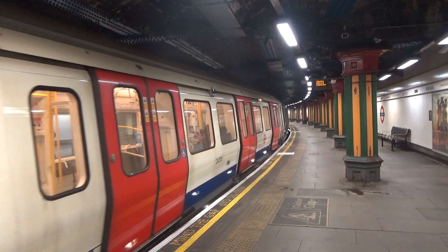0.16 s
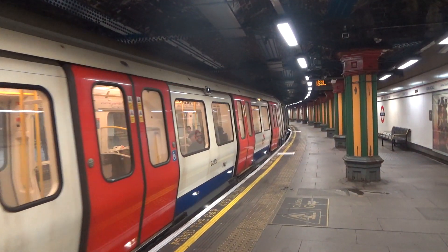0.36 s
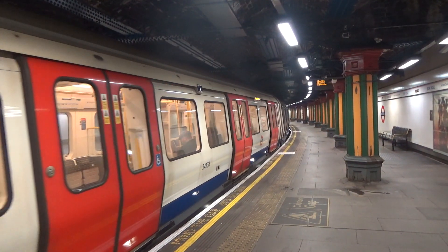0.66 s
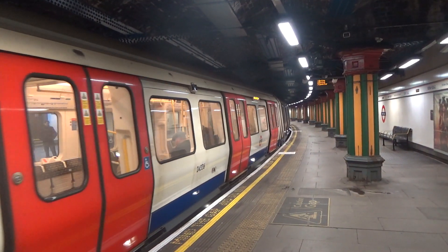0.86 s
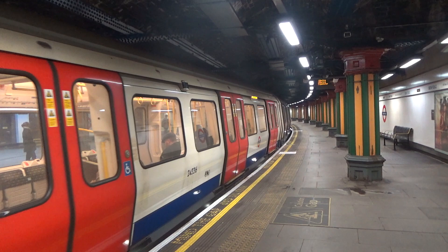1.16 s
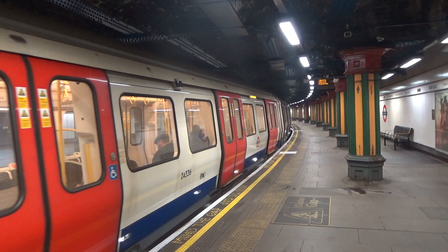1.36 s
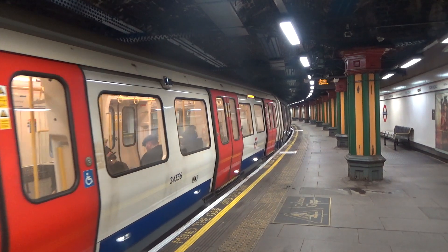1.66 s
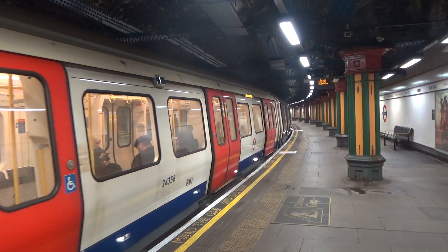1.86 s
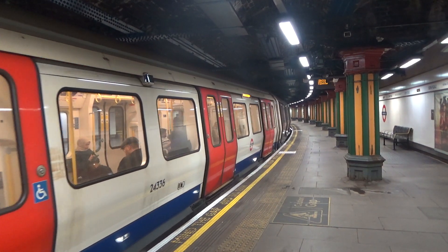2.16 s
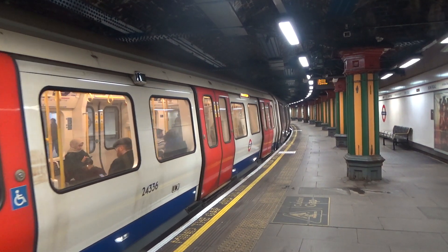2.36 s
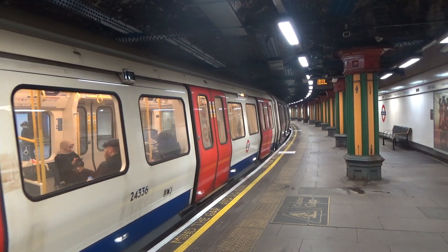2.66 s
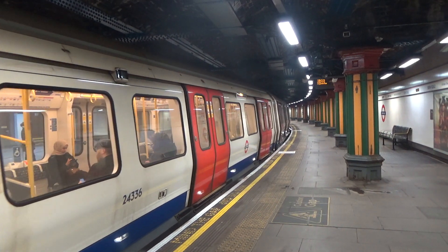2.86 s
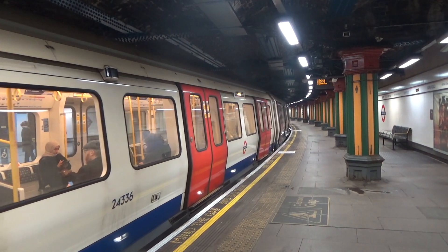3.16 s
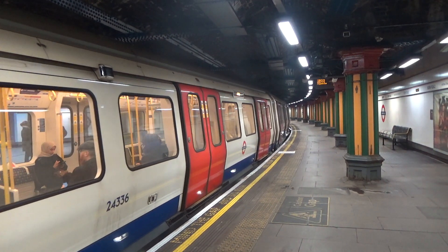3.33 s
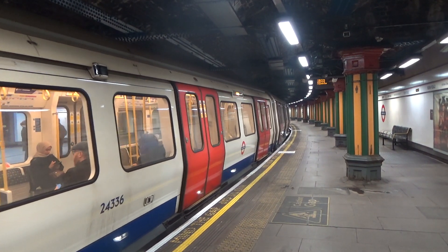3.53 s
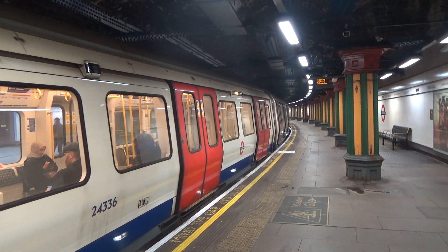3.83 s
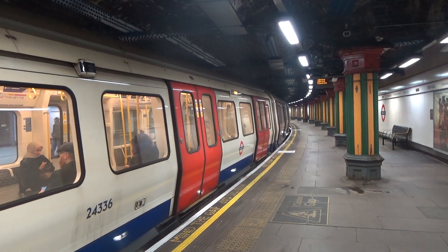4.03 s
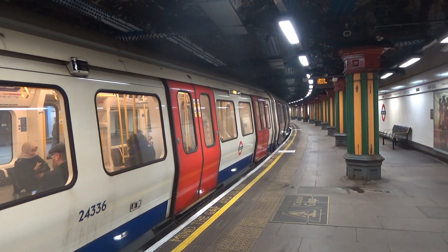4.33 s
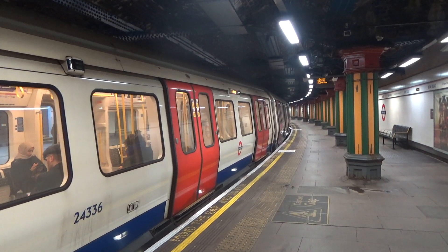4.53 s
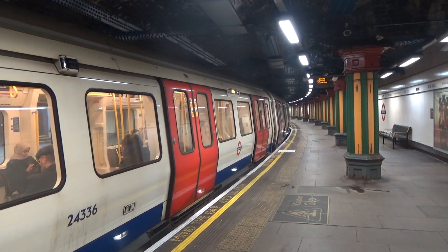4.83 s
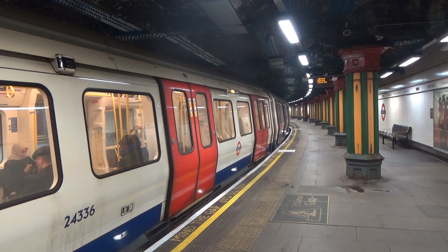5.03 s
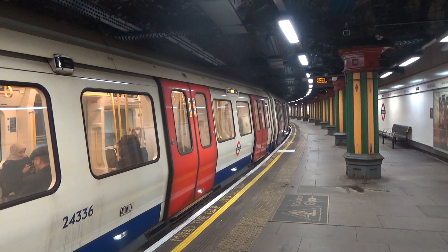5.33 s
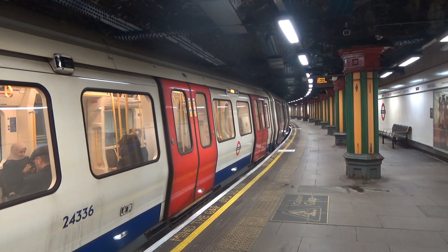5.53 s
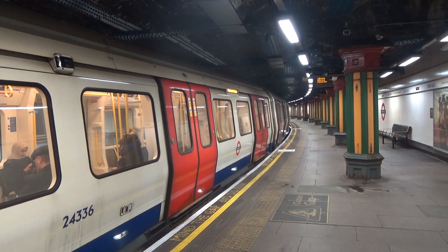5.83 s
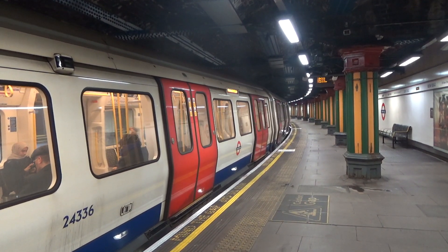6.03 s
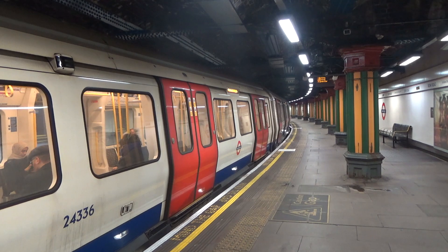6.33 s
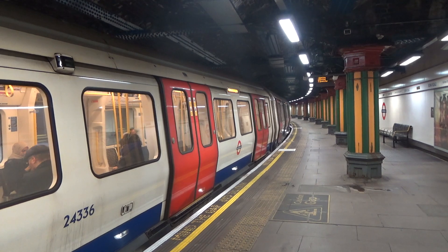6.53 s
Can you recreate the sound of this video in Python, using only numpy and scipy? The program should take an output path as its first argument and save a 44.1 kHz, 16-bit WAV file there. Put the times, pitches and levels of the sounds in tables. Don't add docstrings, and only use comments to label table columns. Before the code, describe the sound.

Close on a hard-walled underground platform, in stereo, a metro train brakes to a stop. Piercing wheel squeals start at once with a brief falling motor whine, then overlap in shifting metallic pitches above a grinding rub. They thin out mid-way, with faint valve puffs, flare once more late, and die away. A low rumble and a hollow ventilation boom continue throughout, leaning slightly left.

```python
import sys
import numpy as np
from scipy import signal
from scipy.io import wavfile
from scipy.ndimage import uniform_filter1d

SR = 44100
rng = np.random.default_rng(int(sys.argv[2]) if len(sys.argv) > 2 else 0)


def invert_db(x):
    u = np.asarray(x, float) / 20
    return 10 ** u


def master(y):
    cut = np.clip(np.atleast_2d(y).T, -1, 1)
    pcm = np.round(cut * 32767)
    wavfile.write(sys.argv[1], SR, pcm.astype(np.int16))


N = 295019


def rms_one(x):
    return x / np.sqrt(np.mean(np.abs(x) ** 2) + 1e-20)


def in_time(rows):
    s, *columns = np.transpose(rows)
    return [np.interp(np.arange(N) / SR, s, column) for column in columns]


def at_hz(points, hz):
    points_hz, db = np.transpose(points)
    return np.interp(np.log(hz), np.log(points_hz), db)


def drift(rate_hz, size=N, channels=1):
    r = np.exp(-32 * np.pi * rate_hz / SR)
    noise = rng.standard_normal((channels, size // 16 + 602))
    slow = signal.lfilter([1], [1, -2 * r, r * r], noise)[:, 600:]
    at = np.arange(size) / 16
    return np.array([np.interp(at, np.arange(len(v)), v) for v in rms_one(slow)])


def resonance(x, hz, width_hz):
    r = np.exp(-np.pi * width_hz / SR)
    zeros = np.array([1, 0, -1]) * (1 - r * r) / 2
    poles = [1, -2 * r * np.cos(2 * np.pi * hz / SR), r * r]
    return signal.lfilter(zeros, poles, x)


def grip_db(grabs, t, hz):
    rise_db_per_s, fall_db_per_s = 650, 85 * (hz / 5000) ** 0.081
    u = t[::32]
    power = 0
    for start, held, db in grabs:
        rise_db = rise_db_per_s * np.maximum(start - u, 0)
        fall_db = fall_db_per_s * np.maximum(u - start - held, 0)
        power = power + invert_db(db - rise_db - fall_db) ** 2
    return np.interp(t, u, 10 * np.log10(power + 1e-20))


# (frequency [Hz], level [dB])
SIDE_SHARE = [(30, -41), (100, -22), (1000, -27), (1800, -28.5), (3000, -26.5), (6000, -14.5), (11000, -18),
              (15000, -25)]


def mid_side(hz):
    return np.array([[1], [invert_db(at_hz(SIDE_SHARE, hz))]])


def sing(hz, level_db, spread_hz, steady, skirt_db):
    paths = drift(spread_hz, size=len(hz), channels=4)
    paths[0] += invert_db(skirt_db) * np.sqrt(2) * drift(4 * spread_hz, size=len(hz))[0]
    turn = 2 * np.pi * np.cumsum(hz) / SR
    tone = (paths[:2] + steady) * np.cos(turn) + paths[2:] * np.sin(turn)
    mid_power = ((paths[0] + steady) ** 2 + paths[2] ** 2) / 2
    power = uniform_filter1d(mid_power, size=int(.09 * SR))
    return invert_db(level_db) * mid_side(np.mean(hz)) * tone / np.sqrt(power)


def banded_noise(spectrum, patchy_db):
    out, size = 0, N // 16 + 1
    together = drift(48.0, size=size)
    edges = 20 * 2 ** np.arange(0, 10.1, 1 / 3)
    white = rng.standard_normal((2, 2, N))
    for k, (low, high) in enumerate(zip(edges, edges[1:])):
        if high <= spectrum[0][0] or low >= spectrum[-1][0]:
            continue
        hz = np.sqrt(low * high)
        band_pass = signal.butter(2, [low, high], "band", fs=SR, output="sos")
        band = signal.sosfilt(band_pass, white[k % 2])
        flicker_db = patchy_db * (.5 * together + drift(380, size=size))
        gain = invert_db(at_hz(spectrum, hz) + flicker_db).repeat(16)[:N]
        out = out + gain * band * mid_side(hz)
    return rms_one(out) * np.sqrt(2)


# (time [s], held [s], level [dB])
GRABS_LOW = [
    [(.9, 0.12, -43.5), (1.02, 0.199, -43), (1.25, 0.17, -32.5), (1.44, 0.025, -25.5), (1.57, 0.058, -31),
     (1.7, 0.3, -40.5), (2.1, 0.084, -28.5), (2.18, 0.032, -32.5), (2.3, 0.085, -33), (2.55, 0.17, -38),
     (2.83, 0.16, -47)],
    [(1.49, 0.21, -36), (1.75, 0.22, -39), (1.95, 0.17, -35.5), (2.25, 0.4, -38.5)],
    [(4.7, 0.17, -45.5), (4.85, 0.14, -40), (5.05, 0.26, -35.5), (5.24, 0.19, -37.5), (5.5, 0.18, -49),
     (5.7, 0.29, -56)],
    [(5.1, 0.093, -51), (5.22, 0.072, -41), (5.29, 0.044, -29.5), (5.45, 0.072, -41.5), (5.55, 0.1, -44),
     (5.7, 0.32, -55)],
]
GRABS_MID = [
    [(0, 0.16, -25.5), (.2, .9, -34.5), (.45, 0.11, -27), (1.1, .4, -32.5)],
    [(0, 0.64, -32.5), (.71, 0.057, -24), (.9, 0.26, -27), (1.15, .3, -31), (1.46, 0.17, -22.5),
     (1.7, 0.029, -26.5), (1.8, 0.14, -32.5), (2.0, 0.14, -35), (2.25, 0.17, -42), (2.5, 0.3, -41)],
    [(.6, 1.3, -47), (1.9, 0.18, -40), (2.14, 0.096, -33), (2.3, 0.7, -37.5), (2.8, 0.1, -36.5),
     (3.0, 0.36, -38.5), (3.14, 0.024, -32.5), (3.41, 0.11, -27.5), (3.6, 0.13, -26.5), (3.9, 0.26, -45.5)],
    [(4.72, 0.091, -55), (4.85, 0.22, -44), (5.05, .1, -46), (5.15, .17, -36.5), (5.35, 0.13, -44),
     (5.47, 0.084, -45)],
]
GRABS_HIGH = [
    [(.57, 0.25, -37.5), (.9, 0.22, -46), (1.12, 0.12, -26), (1.3, 0.034, -27.5), (1.5, 0.29, -39.5),
     (1.85, 0.35, -44.5), (2.2, 0.31, -35.5), (2.6, 0.24, -30), (2.85, 0.15, -27.5), (3.1, 0.022, -30.5),
     (3.2, .03, -34)],
    [(4.09, 0.11, -45), (4.2, 0.078, -33.5), (4.4, 0.023, -39), (4.64, .1, -41), (4.75, 0.054, -28),
     (4.9, 0.067, -25.5), (5.05, 0.083, -23), (5.17, 0.16, -36)],
]
GRABS_THIN = [
    [(2.65, .12, -45), (2.78, 0.17, -32), (2.9, 0.052, -29.5), (3.15, 0.076, -34), (3.3, 0.083, -39)],
    [(2.86, 0.064, -27), (3.0, 0.16, -41)],
    [(3.18, 0.16, -36), (3.34, 0.03, -27), (3.5, 0.1, -32.5), (3.65, .1, -38), (3.8, 0.16, -56)],
    [(4.0, 0.087, -48), (4.04, .04, -39.5), (4.08, 0.032, -32.5), (4.18, 0.1, -37), (4.4, .1, -50),
     (4.62, .08, -51.5)],
    [(4.77, .1, -52), (4.9, .15, -42), (5.05, 0.15, -36), (5.3, 0.051, -45)],
    [(.3, 0.36, -42.5), (.9, 0.16, -43.5), (1.78, .4, -47), (2.2, 0.77, -46)],
]
# (time [s], pitch [Hz])
SQUEAL_PITCH = [
    [(.87, 3530), (1.17, 3550), (1.32, 3470), (2.42, 3480), (2.57, 3530), (2.95, 3520)],
    [(1.47, 3240), (1.66, 3230), (1.74, 3145), (2.42, 3110), (2.6, 3040)],
    [(4.67, 3960), (4.97, 3950), (5.12, 3910), (6.12, 3870)],
    [(5.1, 3300), (5.27, 3230), (5.42, 3250), (6.02, 3230)],
    [(0, 5210), (.12, 5235), (.27, 5290), (.82, 5270), (1.62, 5285)],
    [(0, 5480), (.47, 5495), (.8, 5500), (1.33, 5450), (1.6, 5475), (1.8, 5455), (2.3, 5550), (2.67, 5580)],
    [(.62, 5020), (1.57, 5010), (2.42, 5060), (4.32, 5010)],
    [(4.97, 6320), (5.32, 6400)],
    [(.52, 10290), (1.32, 10390), (1.72, 10290), (3.47, 10280)],
    [(4.07, 10280)],
    [(2.65, 2965)],
    [(2.86, 3335)],
    [(3.18, 3225)],
    [(4.0, 2381)],
    [(4.8, 5040)],
    [(.3, 5170), (1.8, 5180)],
]
SQUEAL_SPREAD = [21, 22, 20, 30, 30, 28, 30, 30, 39, 18, 16, 17, 14, 14, 20, 30]
# (time [s], held
# [s], level [dB], pitch [Hz], spread [Hz])
CHIRPS = [(0, .03, -45, 9570, 78), (.82, .25, -49, 3880, 40), (1.13, .05, -41, 8600, 57),
          (1.13, .09, -33, 8800, 48), (1.12, .09, -37, 11965, 45), (1.12, .1, -55, 13500, 130),
          (1.19, .05, -46, 1580, 34), (1.2, .07, -40, 8260, 31), (.88, .3, -47, 7060, 80),
          (.67, .4, -55, 8510, 30), (1.6, .5, -66, 12450, 110), (1.13, .1, -56, 12500, 60),
          (1.05, .15, -46, 10580, 50), (1.15, .5, -54, 10050, 90), (2.45, .2, -56, 13850, 40),
          (2.45, .12, -64, 15600, 60), (.25, .35, -37, 5545, 25), (0, 1.7, -51, 5700, 90),
          (1.4, .7, -48, 10380, 70), (1.8, .08, -43, 2790, 34), (1.93, .05, -44, 2800, 34),
          (2.05, .17, -44, 2785, 30), (2.3, .15, -48, 2790, 34), (2.5, .3, -48, 2780, 40),
          (1.93, .17, -41, 3575, 70), (1.2, .4, -64, 13850, 60), (2.05, .2, -65, 13850, 40),
          (2.42, .35, -42, 3225, 30), (2.2, 1.5, -55, 7560, 46),
          (2.24, .03, -46, 1770, 30), (2.24, .7, -43, 8495, 22), (2.24, .95, -55, 12030, 40),
                 (2.51, .15, -53, 12325, 35), (2.47, .5, -55, 14060, 45), (2.47, .5, -60, 13200, 150),
                 (2.56, .15, -44, 1785, 21), (2.5, .3, -48, 3835, 30), (2.65, .5, -44, 3785, 50),
                 (2.53, .08, -50, 4650, 20), (2.67, .15, -46, 4650, 20), (2.95, .15, -54, 4650, 20),
                 (2.68, .4, -42, 6665, 40), (2.4, .55, -50, 5730, 35), (2.25, .6, -48, 5490, 40),
                 (2.7, .15, -46, 5930, 40), (2.85, .36, -40, 5925, 26), (2.85, .3, -48, 8895, 40),
          (3.08, .1, -39, 3580, 30), (3.25, .18, -46, 3420, 20), (3.3, .5, -44, 3020, 25),
               (3.18, .3, -51, 5480, 30), (3.66, .2, -47, 5510, 60), (3.0, .2, -41, 8605, 86),
               (3.15, .6, -41, 5600, 30), (3.16, .3, -52, 7810, 14), (3.24, .25, -51, 6465, 26),
               (3.25, .55, -43, 10050, 30), (3.26, .46, -58, 15095, 43), (3.3, .08, -40, 5340, 10),
               (3.38, .17, -33.5, 5340, 10), (3.4, .35, -44, 2800, 40), (3.5, .25, -44, 3420, 20),
               (3.6, .25, -47, 3560, 30), (3.65, .2, -46, 5340, 20), (3.97, .1, -47, 4770, 17),
               (4.08, .14, -43.5, 4760, 17), (3.52, .25, -48, 7150, 160), (3.28, .2, -58, 11200, 30),
               (3.28, .15, -56, 10650, 30), (3.28, .15, -57, 9480, 30), (4.25, .35, -58, 7560, 30),
               (4.05, .13, -51, 7145, 30), (4.12, .3, -55, 12130, 25), (4.13, .06, -58, 13950, 30),
               (4.12, .22, -43, 8455, 28), (4.4, .2, -57, 8455, 28), (3.5, .15, -49, 6600, 200),
               (3.3, .2, -50, 6230, 30), (4.28, .1, -53, 6630, 64), (4.47, .08, -49, 3465, 14),
               (4.62, .14, -50, 3465, 14),
          (4.7, .25, -56, 12640, 30), (4.98, .28, -56, 12790, 30), (4.74, .05, -53, 12245, 14),
               (4.74, .24, -66, 15410, 30), (4.7, .3, -59, 14220, 20), (5.0, .24, -54, 14190, 20),
               (4.84, .1, -47, 2990, 45), (4.74, .1, -52, 5140, 20), (4.85, .17, -46, 5140, 20),
               (4.86, .08, -55, 5950, 60), (5.27, .15, -47, 6560, 50), (4.93, .2, -41, 10100, 27),
               (4.94, .3, -52, 5680, 42), (4.92, .3, -44, 2845, 28), (5.1, .12, -43, 5150, 30),
               (5.24, .14, -41, 5215, 35), (5.26, .16, -34.5, 3660, 20), (5.5, .1, -50, 3660, 30),
               (5.3, .05, -46, 7295, 56), (5.29, .12, -41, 4270, 14), (5.35, .2, -50, 4180, 40),
               (5.3, .25, -53, 2850, 30), (5.26, .06, -46, 5290, 30), (4.9, .3, -55, 4850, 60),
               (5.44, .12, -45, 1955, 32), (5.7, .8, -54, 2010, 30),]
# (mode [Hz], multiple, level when the mode is at -30 dB [dB],
# gain per dB of the mode [dB])
OVERTONES = [(5502, 2, -52, 0.46), (5262, 2, -44, 0.7), (3255, 2, -41, 1.1), (3544, 2, -37.5, 1),
             (3960, 2, -34, 1.2), (3960, 3, -36, 5)]


def squeals():
    out = np.zeros((2, N))
    lasting = GRABS_LOW + GRABS_MID + GRABS_HIGH + GRABS_THIN
    singers = list(zip(lasting, SQUEAL_PITCH, SQUEAL_SPREAD))
    for start, held, db, hz, spread_hz in CHIRPS:
        singers.append(([(start, held, db)], [(start, hz)], spread_hz))
    for grabs, pitch, spread_hz in singers:
        first = max(grabs[0][0] - .1, 0)
        last = max(start + held for start, held, _ in grabs) + .35
        end = first + np.ceil(5 * (last - first)) / 5
        span = np.arange(int(first * SR), min(int(end * SR), N))
        hz = np.interp(span / SR, *np.transpose(pitch))
        level_db = grip_db(grabs, span / SR, hz[0])
        edge = np.minimum(1, (span[-1] - span) / 3000)
        partials = [(1, 0, 0.97)]
        for near, k, db, slope in OVERTONES:
            if abs(hz[0] / near - 1) < .012:
                partials.append((k, db + 30 * slope, slope))
        for k, db, slope in partials:
            tone = sing(k * hz, db + slope * level_db, .75 * k * spread_hz,
                        steady=25 / spread_hz, skirt_db=-19)
            out[:, span] += edge * tone
    return out


# (time [s], centre [Hz], spread [Hz], level [dB])
RUB = [(.85, 3750, 418, -42.5), (1.05, 3604, 199, -34.5), (1.4, 3480, 130.7, -34), (1.5, 3260, 110.1, -40),
       (1.62, 3130, 150.2, -35), (1.85, 3100, 149, -34), (2.1, 3126, 70.1, -37), (2.3, 3122, 109.2, -35.5),
       (2.55, 3124, 169.4, -34), (2.9, 3305, 262.5, -34.5), (3.75, 3510, 297.8, -39.5),
       (4.2, 3680, 421, -53), (5.35, 3280, 148.2, -59), (5.8, 3410, 200, -49), (6.1, 3300, 198.3, -75)]


def rub():
    hz, spread_hz, level_db = in_time(RUB)
    out, rough_hz = 0, 1500
    rough = drift(rough_hz, channels=4)
    for k in (1, 2, 3):
        at = ((np.cumsum(k * spread_hz) / rough_hz + k * N / 4) % N).astype(int)
        turn = 2 * np.pi * k * np.cumsum(hz) / SR
        pair = rough[:2, at] * np.cos(turn) + rough[2:, at] * np.sin(turn)
        out = out + invert_db(level_db - 7 * (k - 1) ** 1.4) * pair * [[1], [invert_db(-19.0)]]
    return out


# (frequency [Hz], level per Hz [dB])
ROLLING = [(20, -21), (50, -13.5), (95, -4.5), (130, -4), (190, 3.5), (330, -17), (420, -9.5), (900, -14.5),
           (1100, -19), (2050, -19), (4100, -30), (6500, -30), (9000, -47)]
# (time [s], load [dB], thunder in the tunnel [dB])
LOAD = [(0, 2.5, -29.5), (.4, 2, -31), (.7, 2, -31), (1.0, 1.5, -38), (1.3, 0.5, -38), (1.9, -2, -41),
        (2.2, 0, -35), (2.5, 0, -41), (3.4, 1.5, -39), (3.85, 2.5, -37), (4.1, 2, -33), (4.5, 0, -35.5),
        (5.3, 1, -33), (5.8, 0, -33.5), (6.1, 0, -35), (6.69, -1, -37)]
# (time [s], held [s], level [dB])
THUDS = [
    (1.08, 0.028, -28.5),
]


def rolling():
    load_db, thunder_db = in_time(LOAD)
    noise = banded_noise(ROLLING, patchy_db=0.88)
    deep = signal.sosfilt(signal.butter(2, 140, fs=SR, output="sos"), noise)
    tread = signal.sosfilt(signal.butter(2, 1200, "high", fs=SR, output="sos"), noise)
    roar = noise - deep - tread
    thud_db = grip_db(THUDS, np.arange(N) / SR, 2000)
    thunder = np.hypot(invert_db(thunder_db), invert_db(thud_db))
    return invert_db(-39.5 + load_db) * roar + thunder * deep + invert_db(-40.5 + 2.12 * load_db) * tread


# (frequency [Hz], level per Hz [dB])
JET = [(2650, 2), (4500, 5), (5400, -22), (5920, -29), (6920, 3.5), (10100, 6.5), (12200, 0), (15600, -13)]
# (time [s], open [s], level [dB])
PUFFS = [(3.472, 0.058, -58), (3.53, .07, -53), (3.62, .1, -56), (3.74, .08, -61), (3.971, 0.032, -68),
         (4.12, 0.13, -67), (4.29, 0.04, -65), (4.425, .02, -64), (4.498, 0.025, -62), (5.9, 0.08, -58),
         (6.12, 0.16, -59.5), (6.31, 0.045, -60), (6.375, 0.18, -60.5), (6.53, 0.056, -64),
         (6.66, 0.043, -66)]
# (time [s], held [s], level [dB])
SCUFFS = [
    (0, 1.05, -62),
    (1.13, .03, -65),
    (2.45, 0.13, -67),
    (2.7, 0.78, -65),
    (4.75, 0.46, -62),
    (5.1, 0.14, -62.5),
    (5.4, 0.33, -66.5),
]


def valves():
    leak_db = -68.5
    scuff_db = grip_db(SCUFFS, np.arange(N) / SR, 8000)
    power = invert_db(leak_db) ** 2 + invert_db(scuff_db) ** 2
    age = np.arange(SR) / SR
    for start, length, level_db in PUFFS:
        fall_db = 14 * age + 110 * np.maximum(age - length, 0)
        jet = invert_db(level_db - fall_db) * np.minimum(age / 0.0053, 1)
        at = int(start * SR)
        power[at:at + SR] += jet[:N - at] ** 2
    return invert_db(10.0) * np.sqrt(power) * banded_noise(JET, patchy_db=.8)


# (time [s], pitch [Hz], level [dB])
WHINE = [
    (0, 955, -37),
    (.2, 922, -40.5),
    (.45, 910, -43.5),
    (.65, 850, -44),
    (.85, 771, -36.5),
    (.95, 774, -60),
]


def motor():
    hz, level_db = np.array(in_time(WHINE))[:, :SR]
    whine = sing(hz, level_db, 40.0, steady=.3, skirt_db=-6)
    return np.pad(whine, [(0, 0), (0, N - SR)])


# (frequency [Hz], width [Hz], level [dB])
BOOM = [(249, 16, 0), (203, 12, -12), (272, 14, -11), (236, 14, -5), (290, 50, -14), (220, 12, -15)]
# (frequency [Hz], level [dB])
HUM = [(147, -44.5), (470, -54.5)]
# (time [s], level [dB], lift of the lowest duct mode [dB])
FAN = [(0, -21.5, 4), (1.0, -21, -6), (1.2, -26, -10), (1.5, -23.5, -9), (1.8, -20.5, -6), (2.1, -30, 8.5),
       (2.25, -21.5, -6), (3.0, -22.5, -6), (3.6, -23.5, 1), (3.95, -24.5, 4), (4.3, -21.5, 6.5),
       (4.7, -22.5, 4.5), (5.2, -25, 6), (5.6, -22, 2.5), (6.0, -23.5, 8), (6.3, -20.5, 6.5),
       (6.69, -23.5, -9)]


def fan():
    boom_db, lift_db = in_time(FAN)
    white = rng.standard_normal((2, N))
    boom = 0
    for k, (hz, width_hz, db) in enumerate(BOOM):
        ring = resonance(resonance(white[k % 2], hz, 2.35 * width_hz), hz, width_hz)
        boom = boom + invert_db(db + lift_db * (hz < 210)) * rms_one(ring)
    even = np.sqrt(uniform_filter1d(boom ** 2, size=int(.3 * SR)))
    tones = sum(sing(np.full(N, hz), db, 3.0, steady=1.5, skirt_db=-20) for hz, db in HUM)
    return invert_db(boom_db) * boom / even * [[1], [0]] + tones


# (time [s], left minus right [dB])
LEAN = [
    (0, .9),
    (1.5, .2),
    (2.5, 1.5),
    (6.69, 1.8),
]


def scene():
    mid, side = squeals() + rub() + rolling() + valves() + motor() + fan()
    bass = signal.sosfilt(signal.butter(1, [45, 500], "band", fs=SR, output="sos"), mid)
    side = side + bass * (invert_db(in_time(LEAN)[0] / 2) - 1)
    return np.array([mid + side, mid - side])


def band_limit(x):
    return signal.sosfilt(signal.butter(12, 15700, fs=SR, output="sos"), x)


def record(dry):
    rounded = 0.59 * np.tanh(dry / 0.6)
    top_cut = signal.ellip(8, .5, 60, 15630, fs=SR, output="sos")
    mix = signal.sosfilt(top_cut, rounded)
    return band_limit(mix)


dry = scene()
out = record(dry)
master(out)
```